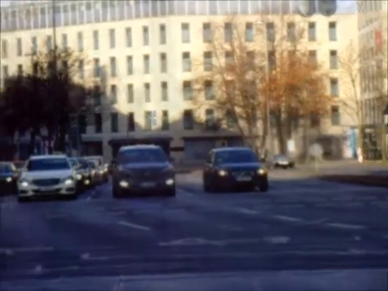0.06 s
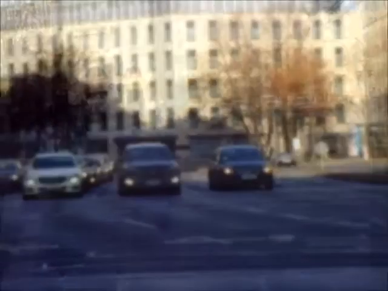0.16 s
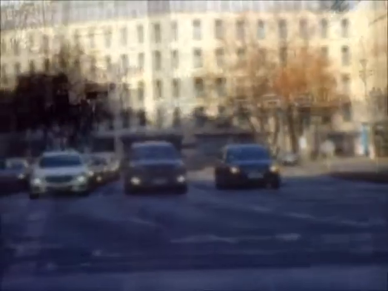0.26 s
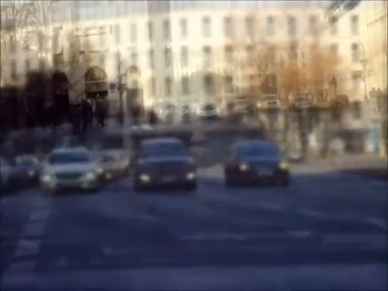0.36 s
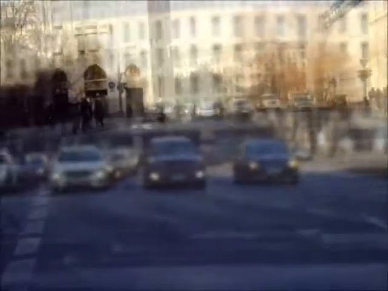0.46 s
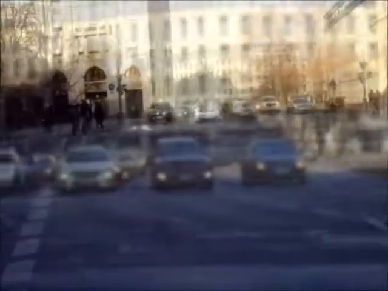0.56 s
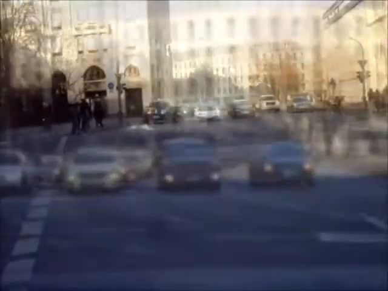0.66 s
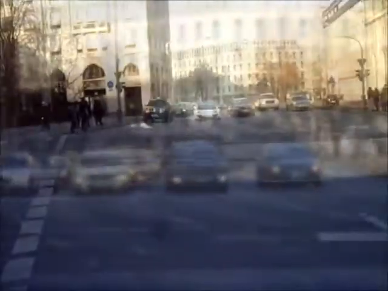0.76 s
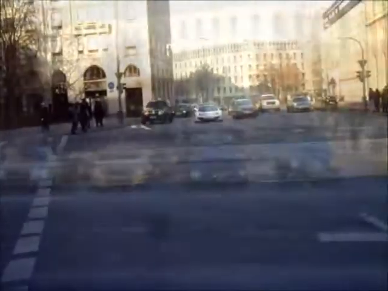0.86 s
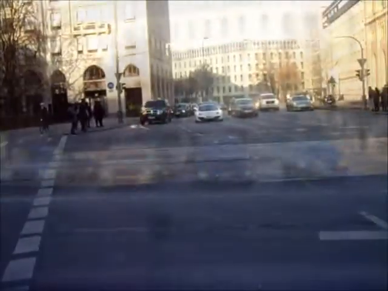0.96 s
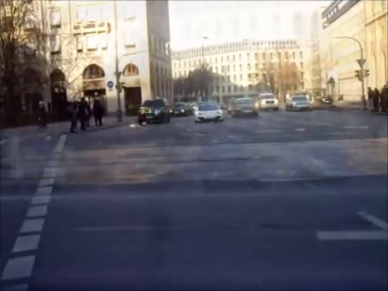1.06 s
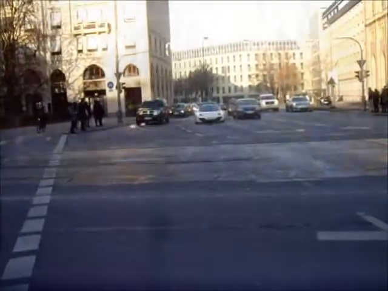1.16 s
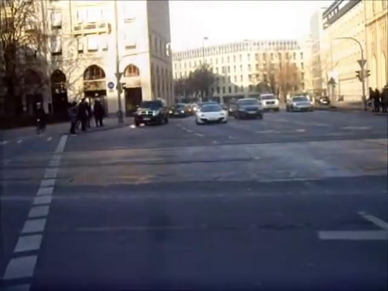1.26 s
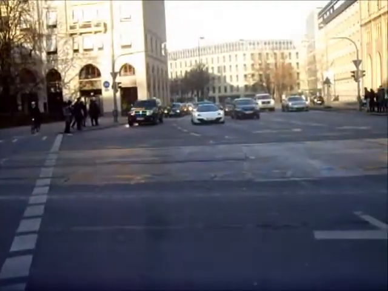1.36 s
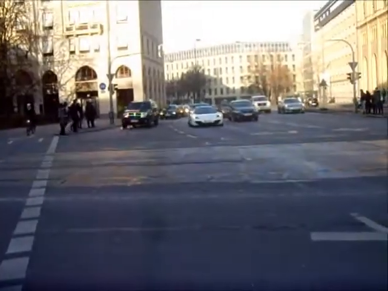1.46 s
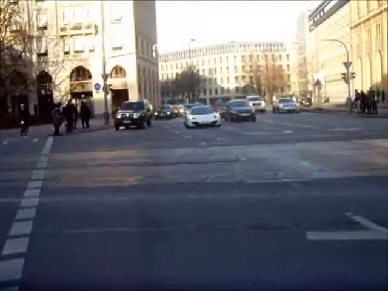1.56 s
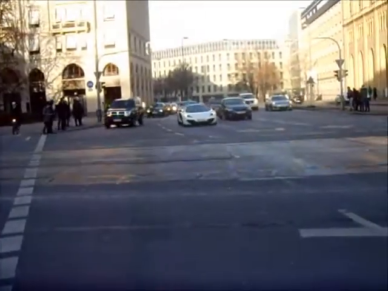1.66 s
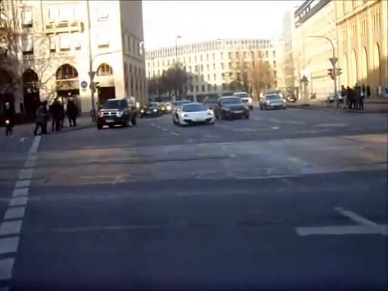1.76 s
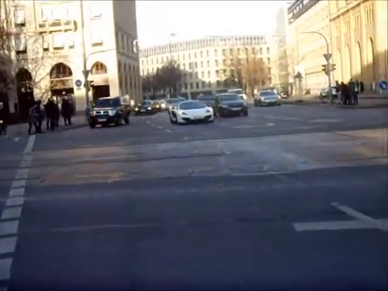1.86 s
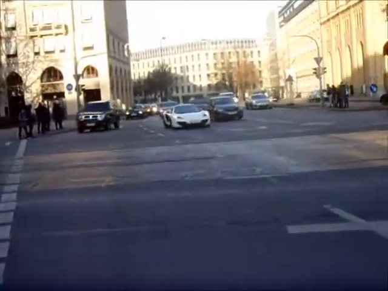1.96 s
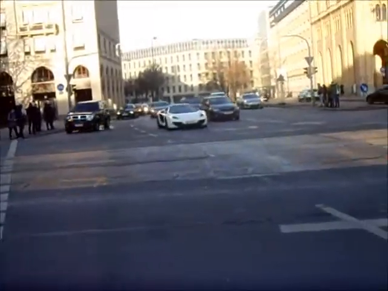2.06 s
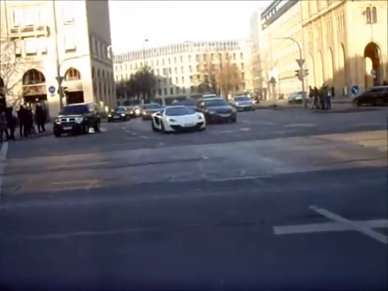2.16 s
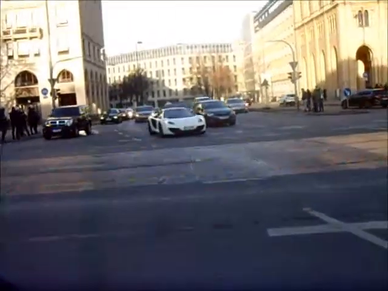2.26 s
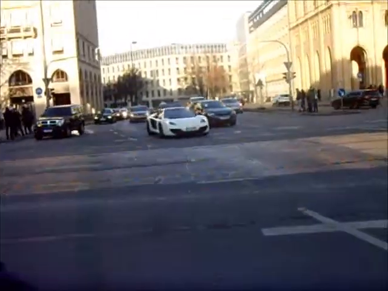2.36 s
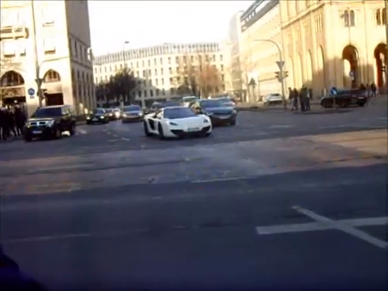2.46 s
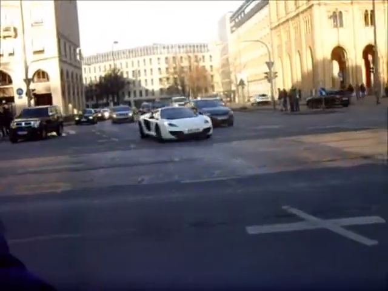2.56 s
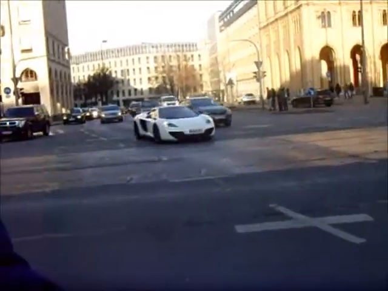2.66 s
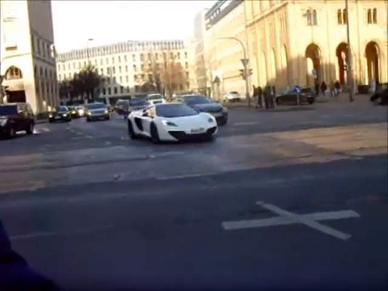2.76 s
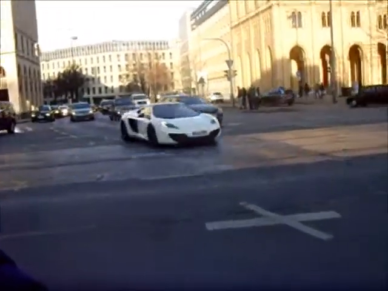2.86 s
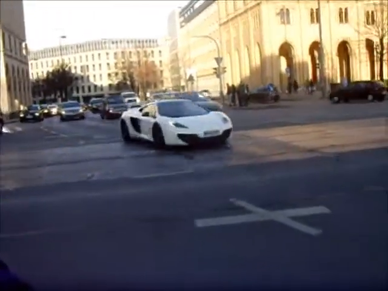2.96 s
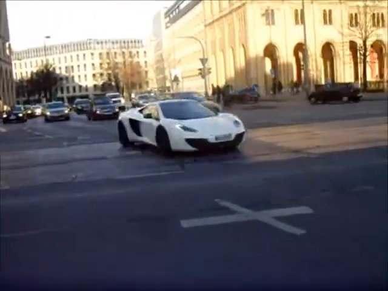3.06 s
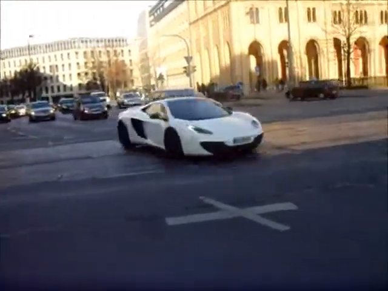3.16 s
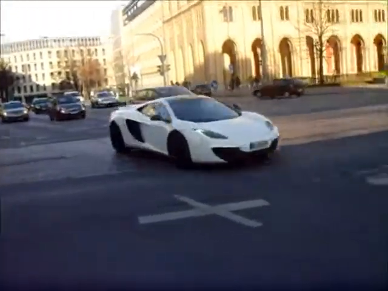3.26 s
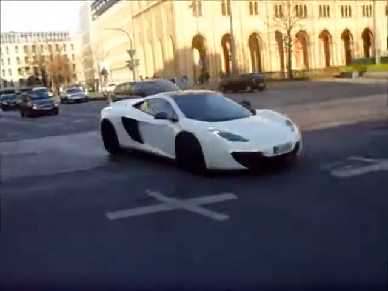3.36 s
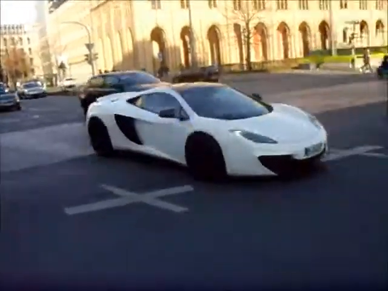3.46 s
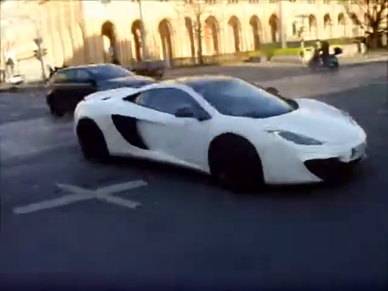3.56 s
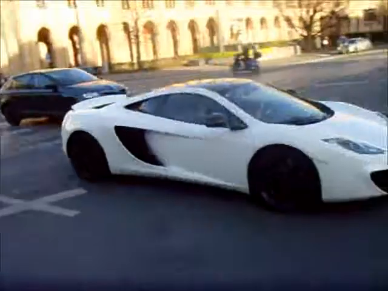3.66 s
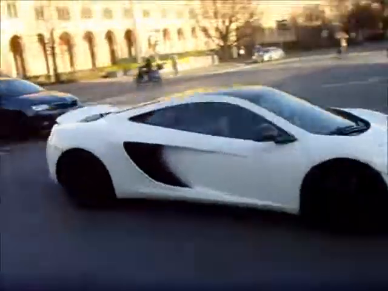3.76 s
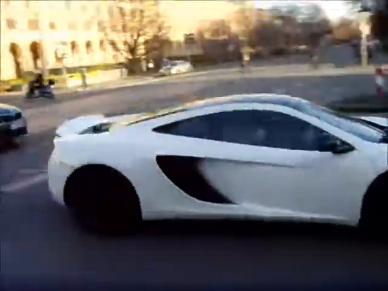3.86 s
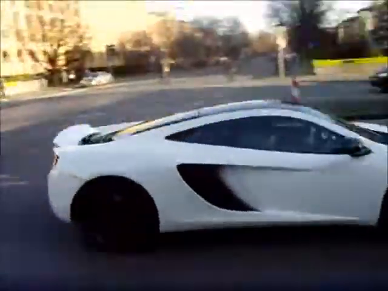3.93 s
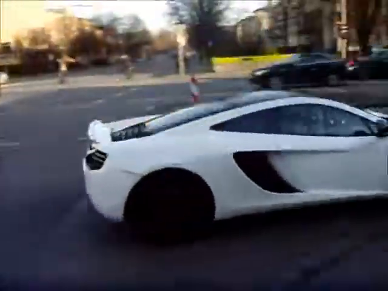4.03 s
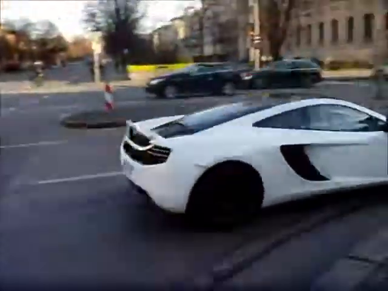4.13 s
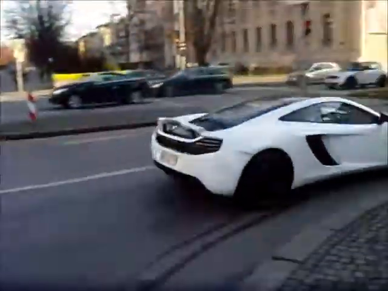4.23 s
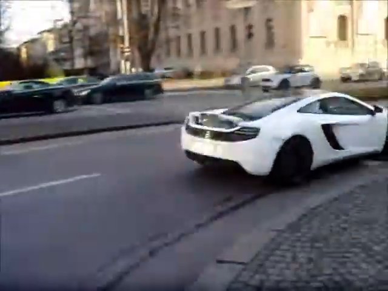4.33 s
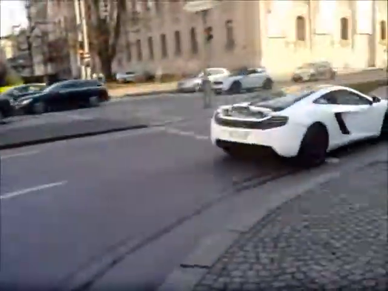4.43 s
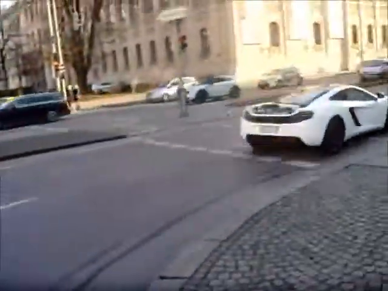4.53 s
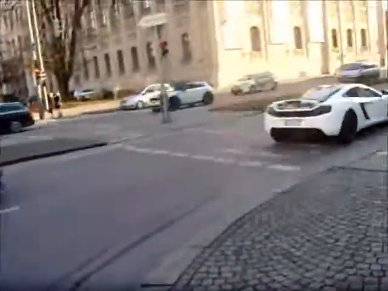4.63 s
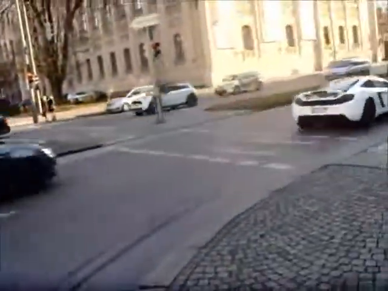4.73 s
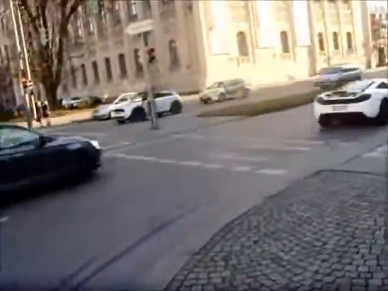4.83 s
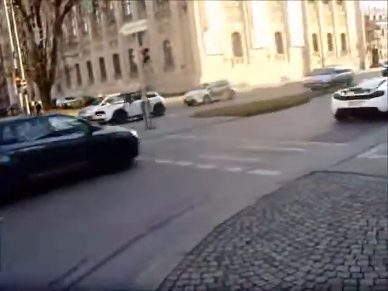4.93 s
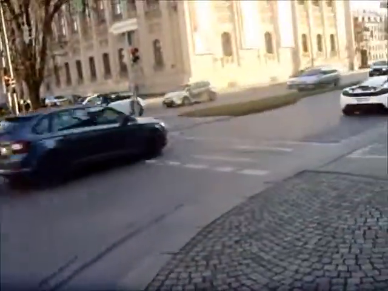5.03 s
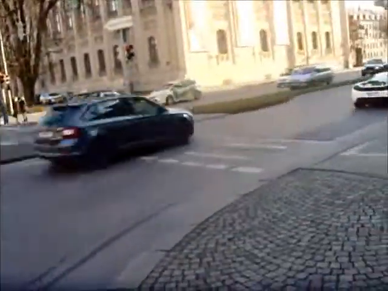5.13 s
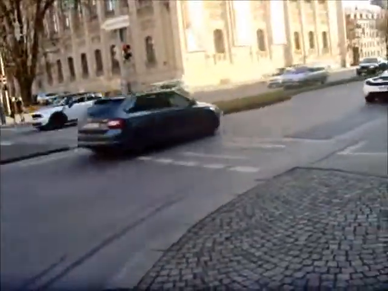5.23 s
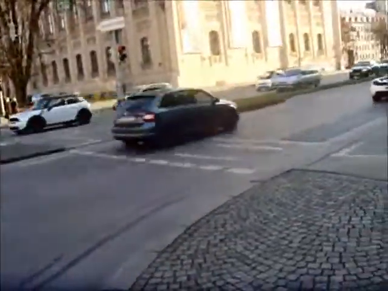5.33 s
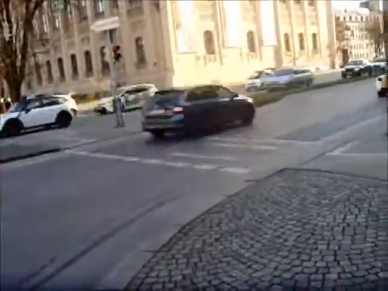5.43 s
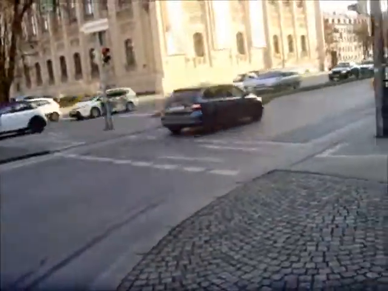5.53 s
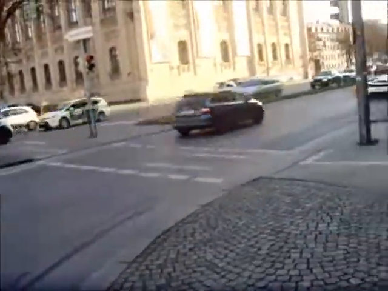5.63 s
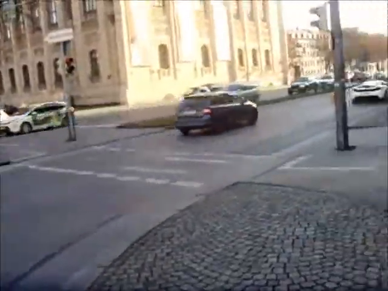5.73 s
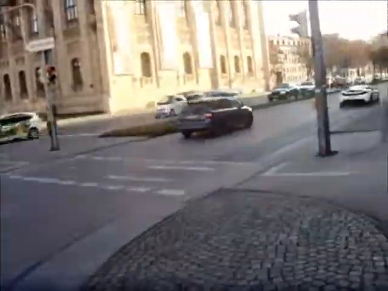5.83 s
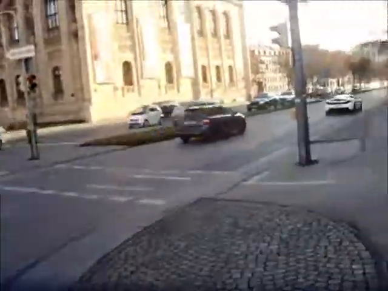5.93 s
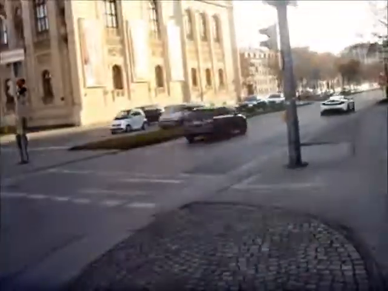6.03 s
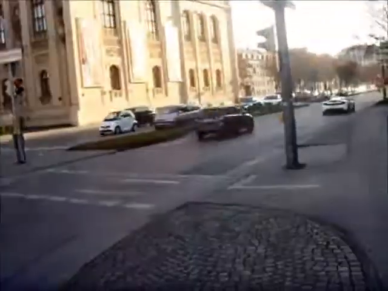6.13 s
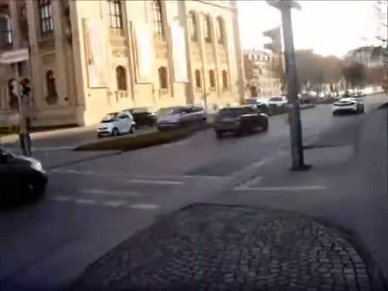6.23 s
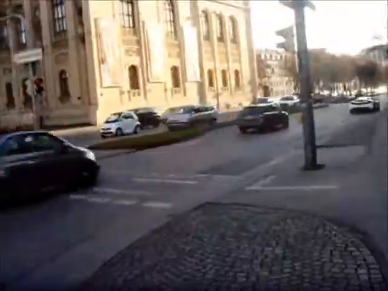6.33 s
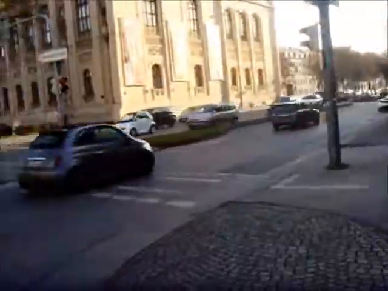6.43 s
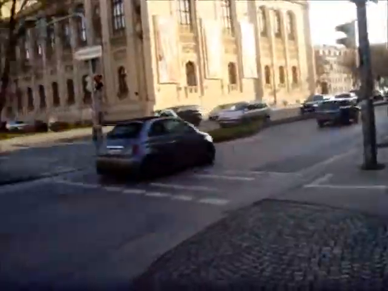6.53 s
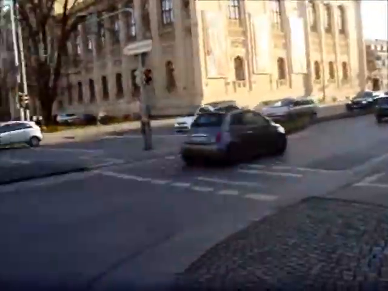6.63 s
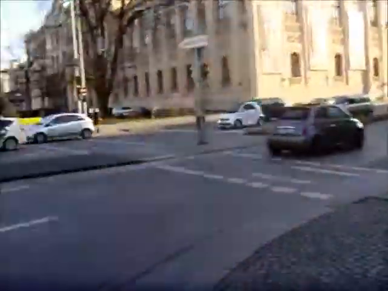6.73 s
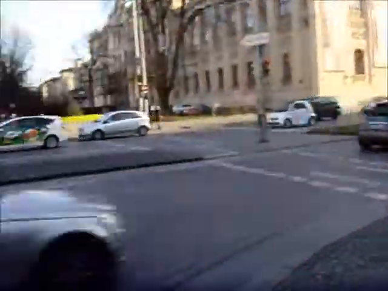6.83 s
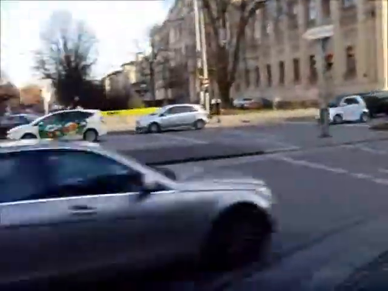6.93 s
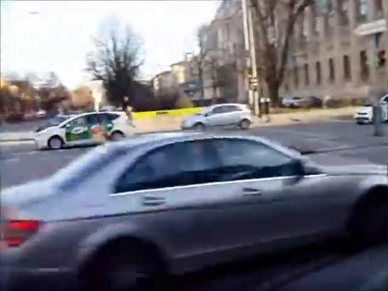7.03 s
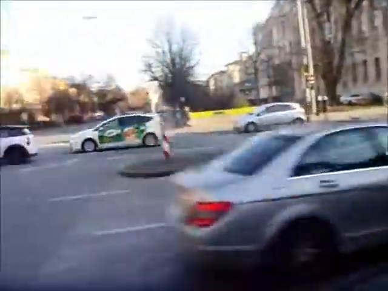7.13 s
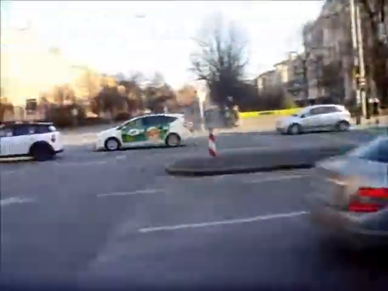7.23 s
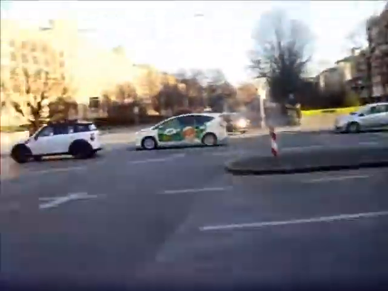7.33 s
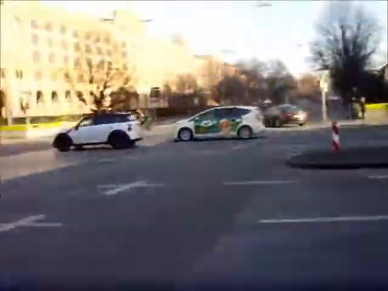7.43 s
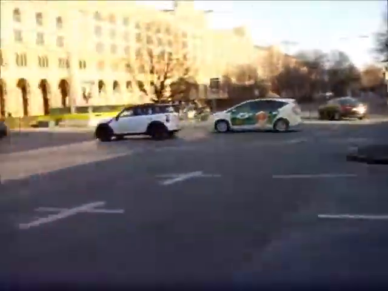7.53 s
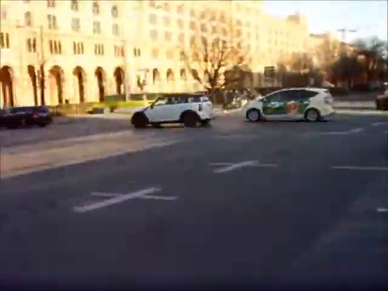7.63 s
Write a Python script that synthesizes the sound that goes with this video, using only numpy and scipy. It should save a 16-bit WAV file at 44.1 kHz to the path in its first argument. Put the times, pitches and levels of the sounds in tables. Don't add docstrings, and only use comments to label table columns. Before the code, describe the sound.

Wide, echoing city junction with deep traffic rumble and tyre roar. A smooth, tonal sports car exhaust climbs, shifts up, climbs again and booms very close around three to four seconds, its tyres knocking and rails cracking sharply. It recedes while following cars roar past, a faint brake squeals, rails clatter again and a saloon growls by. The handheld microphone ticks and slightly overloads.

```python
import sys
import numpy as np
from scipy import signal
from scipy.io import wavfile
from scipy.ndimage import uniform_filter1d

SR = 44100
rng = np.random.default_rng(int(sys.argv[2]) if len(sys.argv) > 2 else 0)


def materialize(psi):
    bounded = np.clip(np.atleast_2d(psi).T, -1, 1)
    quanta = np.round(bounded * 32767).astype(np.int16)
    wavfile.write(sys.argv[1], SR, quanta)


def volts(x):
    e = np.asarray(x, float) / 20
    return 10 ** e


N = 339129
TIME = np.arange(N) / SR

# (time [s], level [dB], brightness [dB])
TYRE_CURVE = [(0.0, -35.5, 2), (1.09, -31.5, 2), (1.63, -31.5, 1.5), (2.65, -27.5, -0.5),
              (2.91, -25.5, 0.5), (3.47, -19, -2.5), (3.79, -17.5, -1.5), (4.1, -16.5, -1.5),
              (4.73, -18, -2.5), (5.5, -21, -2), (5.89, -22.5, -0.5), (6.32, -21, -4), (6.59, -20, 0.5),
              (7.07, -20, -0.5), (7.41, -22, -0.5), (7.69, -22.5, -1.5)]
# (frequency [Hz], density [dB])
ROAR_SPECTRUM = [(250, -9), (410, -8.5), (550, -1.5), (700, -5.5), (900, -5.5), (1150, -7.5), (1500, -12.5),
                 (1800, -15.5), (2400, -48)]
# (frequency [Hz], density [dB])
HISS_SPECTRUM = [(1400, -7.5), (1800, -0.5), (2100, 0), (2400, -3), (2700, -3.5), (3200, -5.5), (3600, -8),
                 (4200, -9.5), (4800, -15.5), (6000, -50)]
# (frequency [Hz], density [dB])
FIZZ_SPECTRUM = [(3800, -29), (4800, 3.5), (6000, 1.5), (7500, 0), (10000, -2.5), (10600, -62.5),
                 (11200, -45.5), (11500, -71)]
# (frequency [Hz], density [dB])
RUMBLE_SPECTRUM = [(18, -22), (30, 23.5), (45, 25.5), (62, 25), (80, 27.5), (110, -29)]
# (frequency [Hz], density [dB])
DRONE_SPECTRUM = [(60, -9), (90, 13), (135, 10), (200, 10), (300, 3.5), (360, 1.5), (480, -43.5)]
# (time [s], swell [dB], half length [s])
ENGINE_SWELLS = [
    (0.922, 6, .08),
    (1.182, 9.5, 0.13),
    (3.546, 4.5, 0.37),
    (4.2, 8.5, 0.12),
    (5.5, 2.5, .2),
    (6.351, 5.5, 0.18),
    (6.8, -4, .15),
    (7.599, -5, 0.22),
]
THIN_S, THIN_HZ, THIN_SHARE = [5, 5.8], 415, 0.29

# (start [s], end [s], pitch before
# lowering by 3 % [Hz], level [dB])
HUM_EVENTS = [
    (3.898, 4.6, 486, -32.5),
    (4.201, 4.547, 519.5, -29),
    (5.301, 6.1, 586, -39),
    (5.799, 6.5, 511.2, -37),
    (5.8, 6.15, 213, -23),
    (0.102, .6, 167.4, -35.5),
    (6.85, 7.7, 301.9, -27),
]
# (time [s], firing rate [Hz], level [dB])
VAN_CURVE = [
    (0, 56.9, -26),
    (.5, 59, -34),
    (.9, 62.26, -32),
    (1.25, 64.8, -31),
    (1.6, 65.1, -33),
    (2.2, 64.8, -40),
    (2.6, 63.95, -31),
    (3, 63.84, -33),
]
# (start [s], end [s], level [dB])
BRAKE_GRIPS = [
    (3.7, 6.45, -62),
    (4.76, 4.81, -49),
    (4.95, 5.15, -55),
    (5.24, 5.38, -49),
    (5.56, 5.78, -47),
    (5.86, 6.0, -57),
]
SQUEAL_HZ, GRIP_S = 10300, 0.035

# (time [s], firing rate [Hz], level [dB], tail toward the microphone [0-1])
SALOON_CURVE = [
    (6.35, 76.7, -31, .4),
    (6.47, 79.3, -27, 0.5),
    (6.55, 81.3, -23, 0.4),
    (6.7, 81.9, -17.5, 0.14),
    (6.84, 77.5, -20.5, 0.7),
    (6.99, 73.72, -18.5, 0.54),
    (7.15, 75.64, -24.5, 0.71),
    (7.4, 77.46, -28.5, .7),
    (7.68, 79.7, -27, 0.19),
]
SALOON_ABREAST_S, SALOON_PASS_S = 7.11, 0.35
# (frequency [Hz], density [dB])
AIR_RUSH_SPECTRUM = [(3000, -25), (3800, -9), (4600, 2), (5300, -10), (6200, -14)]

# (time [s], peak [dB], decay T60 [s])
SHELL_TICKS = [(0.5647, -27.5, 0.0067), (1.06, -37, 0.43), (1.347, -20, 0.0057), (1.3597, -2, .004),
               (1.422, -40, .004), (1.475, -37, 0.0043), (1.713, -32, 0.065), (1.727, -32, 0.03),
               (1.737, -34, 0.048), (2.24, -33, .01), (2.621, -35, 0.0086)]
# (frequency [Hz], width [Hz], level [dB])
SHELL_MODES = [(5000, 1800, 0), (6300, 2400, -1), (9000, 2600, -3)]
# (frequency [Hz], T60 [s])
ECHO_T60 = [(100, 1.5), (400, 2.85), (3000, 1.4), (10000, 1)]
COMB_S, COMB_SHARE = [1.6, 2.1, 3.6, 4.1], [.14, .36, .36, .14]

# (time [s], peak [dB], knock pitch [Hz])
LATER_TYRE_KNOCKS = [
    (5.0832, -22, 1000),
    (5.316, -14, 1000),
    (6.1484, -19, 1000),
    (6.3398, -10.5, 930),
    (6.4425, -11, 1000),
    (6.4925, -22, 900),
    (6.535, -22, 899),
    (6.555, -13, 857),
]
# (time [s], peak [dB], loose metal relative to crack [dB])
LATER_RAIL_CRACKS = [(5.0832, -23.5, -12), (5.2049, -29, 1.5), (5.316, -23, -17), (5.3426, -34, 3),
                     (5.5052, -20, -11), (6.1484, -24, -18), (6.3051, -23.5, -6), (6.3398, -21, -15),
                     (6.3486, -15.5, -8.5), (6.3552, -23, -4), (6.3949, -20.5, -8), (6.4425, -27, -11),
                     (6.4461, -15.5, -8), (6.4925, -18, -8), (6.4972, -17, -16), (6.5063, -27, -16),
                     (6.535, -23, -16)]
# (time [s], peak [dB], knock pitch [Hz])
TYRE_KNOCKS = [(2.983, -12, 850), (3.036, -17, 900), (3.1558, -13, 800), (3.2138, -11, 900),
               (3.261, -3.5, 1150), (3.2802, -11, 900), (3.3136, -15, 1200), (3.3897, -7.5, 1150),
               (3.437, -18, 1000), (3.444, 1.0, 1050), (3.4804, -6, 900), (3.499, -4, 1250),
               (3.6049, -13, 1400), (3.6178, .5, 1250), (3.6519, -16, 1100), (3.6608, -6, 1150),
               (3.714, -4.5, 1000)]
# (time [s], peak [dB], loose metal relative to crack [dB])
RAIL_CRACKS = [(3.036, -19.5, -15), (3.1558, -13, -12), (3.1658, -16, -19), (3.204, -18, -8),
               (3.261, -34, -2), (3.2709, -11, -17), (3.2802, -24, -9), (3.2879, -17, -10),
               (3.295, -35, 11), (3.3136, -23.5, 5), (3.379, -17, -3), (3.3897, -13.5, -12),
               (3.4, -21, -13), (3.4221, -19.5, -5), (3.437, -16, -8), (3.444, -27, -9.5),
               (3.4804, -30, -14), (3.4904, -16.5, -16), (3.499, -27, -6), (3.6049, -12.5, -17),
               (3.6178, -20, 1.5), (3.635, -33, -10), (3.6519, -10, -16)]
# (time [s], pitch [Hz], peak [dB])
CARCASS_BOOMS = [
    (3.033, 702, -21),
    (3.070, 697, -18),
    (3.146, 949, -22),
    (3.156, 690, -12),
    (3.240, 850, -20),
    (3.268, 684, -10.5),
    (3.292, 666, -16),
    (3.384, 680, -8),
    (3.482, 685, -12),
]

# (time [s], firing rate [Hz], firing tone [dB], unevenness of the cylinders [dB])
SPORTS_CURVE = [(0.0, 115.6, -24, -18), (0.35, 124.7, -26.5, -26), (0.8, 164.4, -19.5, -32.5),
                (1.3, 195.5, -20.5, -20), (1.65, 213.2, -17, -19.5), (2.27, 163.1, -17.5, -40),
                (2.85, 189.3, -17.5, -25), (3.33, 208.8, -7.5, -27), (3.42, 201.9, -5.5, -27),
                (3.55, 212.6, -8.5, -31), (3.64, 191, -4.5, -25), (3.78, 176, -5.5, -37),
                (3.96, 165, -5.5, -26.5), (4.6, 168.1, -6, -18), (4.93, 171.3, -10, -7),
                (5.27, 175, -14.5, -12.5), (5.7, 141, -18, -27), (7.68, 147.6, -34, -9)]
# (frequency [Hz], gain [dB])
TAILPIPE_GAIN = [(230, -11), (290, -4), (330, -11.5), (375, -14.5), (400, -25), (430, -36)]
OVERRUN_DB, OVERRUN_HZ_PER_S = 4.5, 70
TAIL_TURNS_S = [3.55, 3.75]


def evened(x):
    return x / np.sqrt(np.mean(x ** 2) + 1e-20)


def peaked(x):
    return x / abs(x).max()


def read(points, hz):
    f, value = np.transpose(points)
    return np.interp(np.log(hz + 1), np.log(f + 1), value)


def columns(rows):
    s, *values = np.transpose(rows)
    return [np.interp(TIME, s, v) for v in values]


def during(rows, fade_s):
    since_start = TIME - rows[0][0]
    to_end = rows[-1][0] + fade_s - TIME
    return np.clip(np.minimum(since_start, to_end) / fade_s, 0, 1)


def add(mix, s, sound):
    part = mix[round(s * SR):][:len(sound)]
    part += sound[:len(part)]


def drift(top_hz):
    lowpass = signal.butter(2, top_hz, fs=SR, output="sos")
    return evened(signal.sosfilt(lowpass, rng.standard_normal(N)))


def noise(colour, patchy_db, size=1024):
    hz = np.fft.rfftfreq(size, 1 / SR)
    real, imag, patches = rng.standard_normal((N * 4 // size + 5, len(hz), 3)).T
    patches = uniform_filter1d(patches, size=9, axis=0)
    patches = evened(uniform_filter1d(patches, size=10, axis=1))
    z = (real + 1j * imag) * volts(read(colour, hz)[:, None] + patchy_db * patches)
    return evened(signal.istft(z, nperseg=size, noverlap=size * 3 // 4)[1][:N])


def ring(x, hz, width):
    b, a = signal.iirpeak(hz, hz / width, SR)
    return signal.lfilter(b, a, signal.lfilter(b, a, x))


def burst(t60, chance, rise_s, tail):
    t = np.arange(len(chance)) / SR
    blow = np.sign(chance[0]) * np.exp(-((t - 3 * rise_s) / rise_s) ** 2)
    onset = np.minimum(t / rise_s / 3, 1)
    return blow + tail * chance * onset * volts(-60 * t / t60)


def orders(firing_hz, levels, unsteady, rough_db, scatter=1):
    crank = 2 * np.pi * np.cumsum(firing_hz * (1 + unsteady * drift(12.3))) / SR
    total = 0
    for order, db in levels:
        level = volts(db + rough_db * drift(30))
        total = total + level * np.cos(order * crank + scatter * 2 * np.pi * rng.random())
    return crank, np.sqrt(2) * total


def distant_engines(near_db):
    swell_db = sum(db * np.exp(-((TIME - s) / half) ** 2) for s, db, half in ENGINE_SWELLS)
    rumble = volts(-25.5 + 0.56 * near_db + swell_db) * noise(RUMBLE_SPECTRUM, patchy_db=1.7, size=4096)
    drone_db = -26.5 + 0.58 * near_db + 0.089 * swell_db
    return rumble + volts(drone_db) * noise(DRONE_SPECTRUM, patchy_db=-0.9, size=4096)


def traffic(crank, puffs):
    level_db, bright_db = columns(TYRE_CURVE)
    near_db = level_db + 25
    abreast = np.exp(-((TIME - SALOON_ABREAST_S) / SALOON_PASS_S) ** 2)
    roar = volts(level_db - 0.86) * noise(ROAR_SPECTRUM, patchy_db=0.93)
    roar = roar - np.interp(TIME, THIN_S, [0, THIN_SHARE]) * ring(roar, THIN_HZ, 330)
    hiss_db = -35.0 + 0.84 * near_db + 0.31 * bright_db - 2.8 * abreast
    hiss = volts(hiss_db) * noise(HISS_SPECTRUM, patchy_db=1.0)
    fizz_db = -46.5 + 1.06 * near_db + 1.18 * bright_db + 1.5 * abreast
    fizz = volts(fizz_db) * noise(FIZZ_SPECTRUM, patchy_db=1.3)
    pulse = 1 + puffs + 0.065 * np.cos(crank / 2) + 0.078 * np.cos(crank)
    return (roar + hiss + fizz) * pulse + distant_engines(near_db)


def square(x):
    taps = np.zeros(SR)
    at = np.arange(900, SR - 40, 40)
    taps[at + rng.integers(0, 40, len(at))] = rng.choice([-1., 1.], len(at))
    hz, t, z = signal.stft(taps, SR, nperseg=512)
    decay = volts(-60 * t / read(ECHO_T60, hz)[:, None])
    tail = signal.istft(z * decay, SR, nperseg=512)[1]
    return signal.fftconvolve(x, tail / np.linalg.norm(tail))[:N]


def bounced(x, delay_s, share):
    late = np.pad(x, (round(delay_s * SR), 0))[:N]
    return x - share * uniform_filter1d(late, size=7)


def hums():
    out = np.zeros(N)
    for start, end, hz, db in HUM_EVENTS:
        tone = orders(hz, [(0.97, db)], unsteady=0.00586, rough_db=0.0)[1]
        out += tone * during([[start], [end]], 0.071)
    return out


def squeal():
    grip = sum(volts(db) * during([[start], [end]], GRIP_S) for start, end, db in BRAKE_GRIPS)
    tone = np.cos(2 * np.pi * np.cumsum(SQUEAL_HZ + 26 * drift(40)) / SR)
    return np.sqrt(2) * grip * volts(-5.0 + 3.1 * drift(25)) * tone


def van():
    hz, db = columns(VAN_CURVE)
    hum = orders(hz, [(1, db), (2, db - 4.5)], unsteady=0.01, rough_db=7.0)[1]
    return hum * during(VAN_CURVE, 0.084)


def ticks():
    out = np.zeros(N)
    highpass = signal.butter(3, 3900, "high", fs=SR, output="sos")
    for (s, db, t60), chance in zip(SHELL_TICKS, rng.standard_normal((len(SHELL_TICKS), 9000))):
        blow = burst(t60, chance, rise_s=.00002, tail=0.037 + 12 * t60)
        click = sum(volts(g_db) * ring(blow, hz, w) for hz, w, g_db in SHELL_MODES)
        click += 60 * min(t60, .05) * ring(blow, 5000, 600)
        add(out, s, volts(db) * peaked(signal.sosfilt(highpass, click)))
    return out


def whoosh():
    close_db = columns(SALOON_CURVE)[1]
    rush = volts(0.86 * close_db - 24.5) * noise(AIR_RUSH_SPECTRUM, patchy_db=0.5)
    return rush * during(SALOON_CURVE, 0.11)


def saloon():
    hz, db, tail = columns(SALOON_CURVE)
    first_db = db - 7.0 + 13 * tail
    fourth_db = db + 0.5 - 17 * tail
    levels = [(1, first_db), (2, first_db / 2 + db / 2 - .6), (3, db), (4, fourth_db),
              (7, first_db - 12), (8, first_db - 10.5)]
    crank, growl = orders(hz, levels, unsteady=.004, rough_db=.8, scatter=.15)
    passing = during(SALOON_CURVE, 0.15)
    puffs = 0.17 * volts(np.minimum(db + 21, 0)) * passing * np.cos(crank)
    return -growl * passing, puffs


def knocks(rows, t60, tail):
    out = np.zeros(N)
    for (s, db, hz), (carcass, *chance) in zip(rows, rng.standard_normal((len(rows), 3000))):
        blow = burst(t60, np.array(chance), .00003, tail)
        body = 0.6 * ring(blow, 720 * (1 + 0.037 * carcass), 210)
        add(out, s, volts(db) * peaked(body + ring(blow, hz, 0.54 * hz)))
    return out


def cracks(rows, t60, tail, width):
    out = np.zeros(N)
    for (s, db, loose_db), chance in zip(rows, rng.standard_normal((len(rows), 3000))):
        blow = burst(t60, chance, .00003, tail)
        crack = peaked(ring(blow, 3120, width) + 0.61 * ring(blow, 4030, 3100))
        loose = peaked(ring(blow, 6750, 5000))
        add(out, s, volts(db + 2.0) * (crack + volts(loose_db + 1.5) * loose))
    return out


def booms():
    out, t = np.zeros(N), np.arange(2000) / SR
    for s, hz, db in CARCASS_BOOMS:
        note = t * volts(-60 * t / 0.024) * np.sin(2 * np.pi * hz * t)
        add(out, s, volts(db) * peaked(note))
    return out


def sports_car():
    hz, tone_db, uneven_db = columns(SPORTS_CURVE)
    near_db = np.maximum(tone_db + 19.5, 0)
    rev_slope = np.gradient(uniform_filter1d(hz, size=4000)) * SR
    overrun = np.clip(-rev_slope / OVERRUN_HZ_PER_S, 0, 1)
    octave_db = tone_db - .72 * near_db * (1 - 1.4 * overrun) + .4 * uneven_db + 8
    octave_db = octave_db + .7 * OVERRUN_DB * overrun * (near_db < 3)
    octave_db = octave_db + read(TAILPIPE_GAIN, 2 * hz) + 1.5 * drift(5.5)
    half_db = tone_db - 25.5 + 8.7 * np.interp(TIME, TAIL_TURNS_S, [0, 1]) + 1.6 * drift(1.2)
    between_db = tone_db + uneven_db + OVERRUN_DB * overrun - .6 + 1.5 * drift(1.78)
    levels = [(1, tone_db + 1.2 * drift(4.2)), (2, octave_db), (.5, half_db), (1.5, between_db),
              (2.5, between_db + near_db / 2 - 14), (3, tone_db + near_db / 2 - 39)]
    crank, exhaust = orders(hz, levels, unsteady=.004, rough_db=.6)
    return crank, exhaust, exhaust * volts(-.6 * near_db)


def scene():
    crank, exhaust, spread = sports_car()
    growl, puffs = saloon()
    others = growl + van()
    first = knocks(TYRE_KNOCKS, t60=0.016, tail=0.18) + cracks(RAIL_CRACKS, t60=0.013, tail=0.31, width=2900)
    later = knocks(LATER_TYRE_KNOCKS, t60=.026, tail=0.3)
    later = later + cracks(LATER_RAIL_CRACKS, t60=0.042, tail=0.36, width=707)
    rails = first + later
    shifting = spread * drift(15.2)
    echoes = square(volts(-10.5) * shifting + volts(-16) * others + volts(-15.5) * rails)
    share = np.interp(TIME, COMB_S, COMB_SHARE)
    street = bounced(traffic(crank, puffs) + rails, delay_s=0.001694, share=share)
    cars = exhaust + others + hums() + booms() + whoosh()
    return (cars + echoes + street + squeal() + ticks())[None]


def top_cut(x):
    return signal.sosfilt(signal.butter(12, 11300, fs=SR, output="sos"), x)


def record(dry):
    clipped = np.clip(dry, -1.0, .8)
    tilted = signal.lfilter(*signal.butter(1, 85, "high", fs=SR), clipped)
    edge = signal.firwin(301, 10900, window=("kaiser", 9.5), fs=SR)
    limited = signal.oaconvolve(tilted, edge[None], "same")
    return top_cut(np.clip(volts(0.36) * limited, -1, 1))


dry = scene()
out = record(dry)
materialize(out)
```